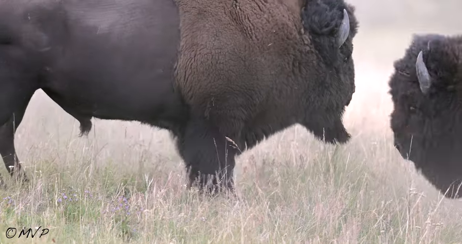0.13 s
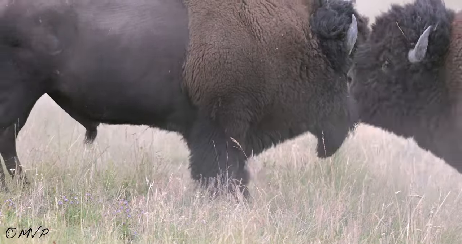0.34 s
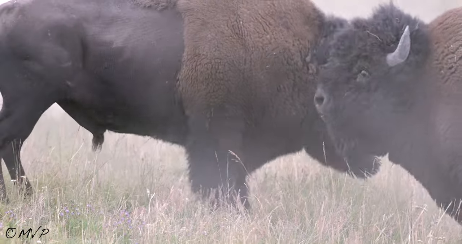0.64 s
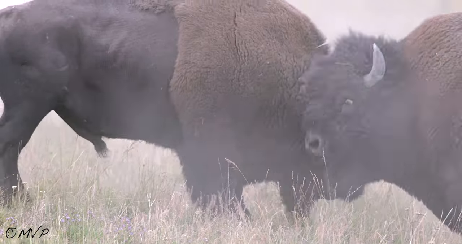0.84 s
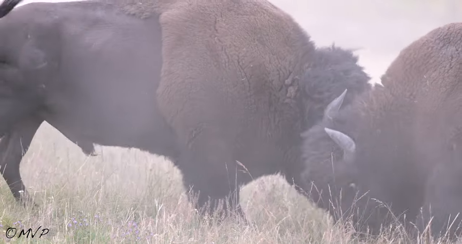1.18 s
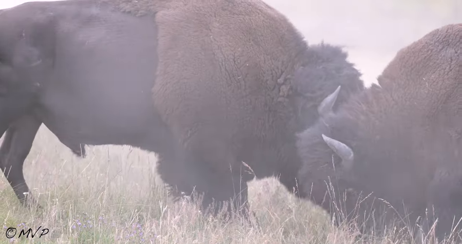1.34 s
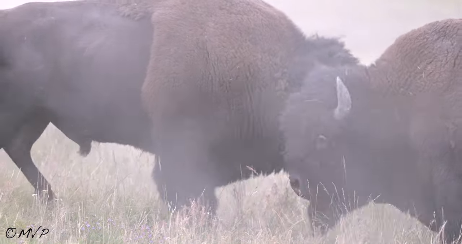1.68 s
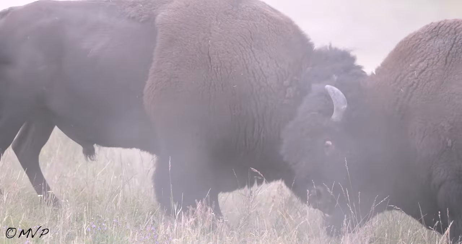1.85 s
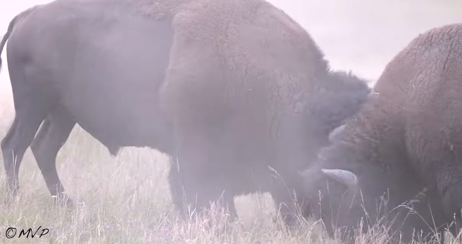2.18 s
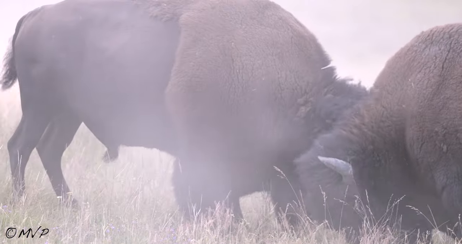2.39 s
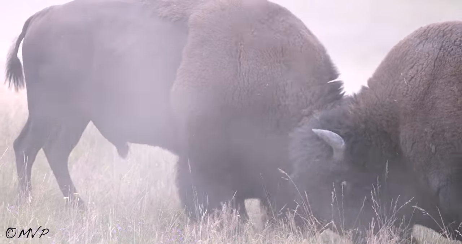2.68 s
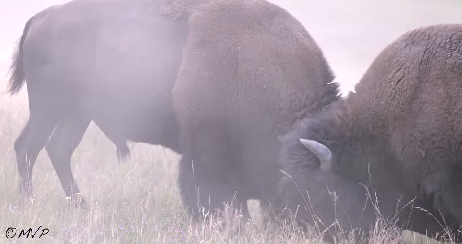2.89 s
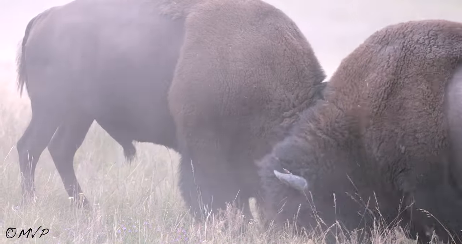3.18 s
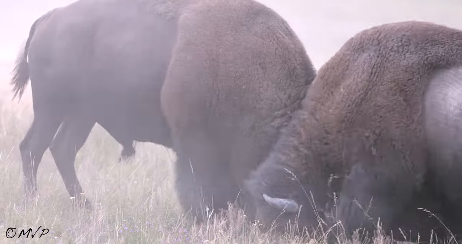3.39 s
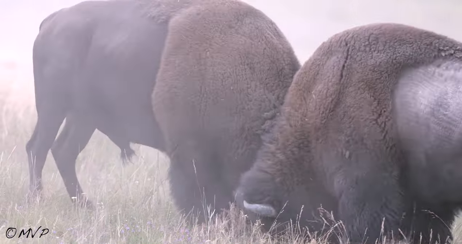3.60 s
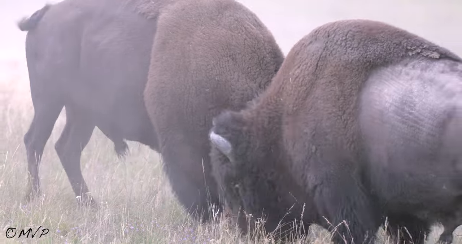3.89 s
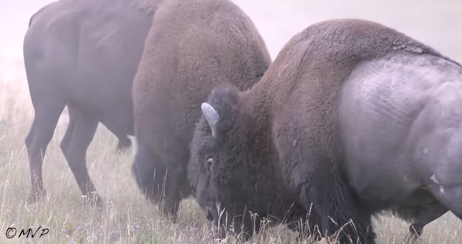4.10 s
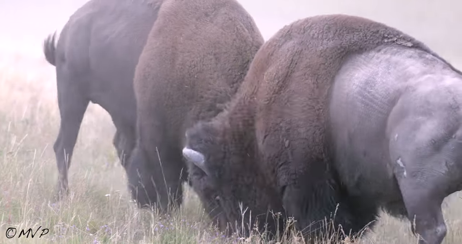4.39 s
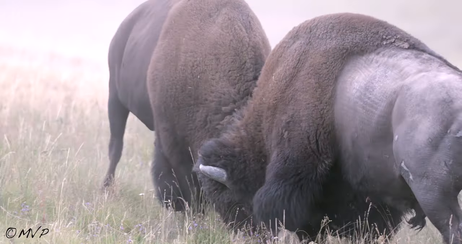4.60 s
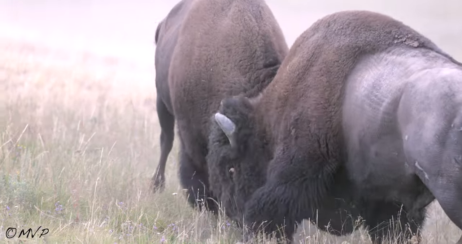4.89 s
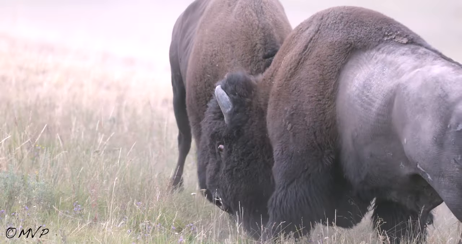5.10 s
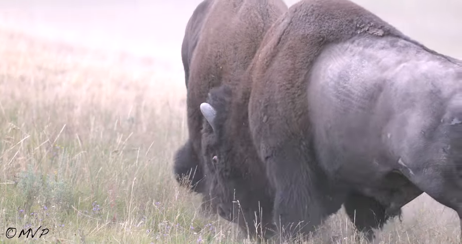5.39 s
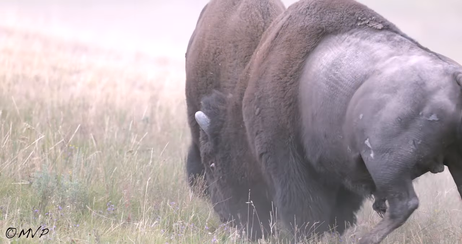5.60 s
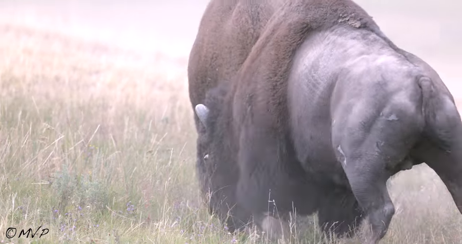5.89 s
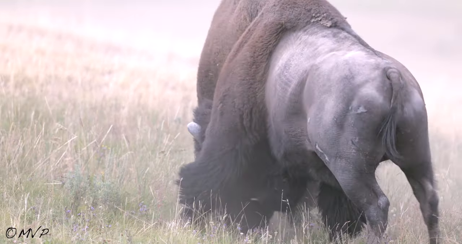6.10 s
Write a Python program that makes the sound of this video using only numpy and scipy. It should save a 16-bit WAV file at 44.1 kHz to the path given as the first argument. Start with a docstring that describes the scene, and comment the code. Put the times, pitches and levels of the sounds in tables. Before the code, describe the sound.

Low pulsing bison growls rumble close by over faint grass rustle, with breathy snorts, hard throaty knocks and late heavy hoof and body blows.

```python
"""Two bison bulls bellow as they shove each other: slow, uneven throat pulses ring chest, throat and mouth.
Some bellows clear into a held tone, and single hard pulses pop out sharply.
The bulls snort noise through the resonances of the nose; hooves and bodies thump as low decaying tones.
Dry grass rustles over a low rumble and a soft hiss, both shaped noise; a small bird chips once."""
import sys
import numpy as np
from scipy import signal
from scipy.fft import rfft, irfft, next_fast_len
from scipy.io import wavfile
from scipy.ndimage import uniform_filter1d, map_coordinates

SR = 44100
rng = np.random.default_rng(int(sys.argv[2]) if len(sys.argv) > 2 else 0)


def waveform_to_disk(signal):
    """Save audio, clipped to [-1, 1], as 16-bit WAV at the path in sys.argv[1]."""
    frames = np.transpose(np.atleast_2d(signal))
    scaled = np.clip(frames, -1, 1) * 32767
    samples = np.round(scaled).astype(np.int16)
    wavfile.write(sys.argv[1], SR, samples)


N = 275614  # samples


def amp(db):
    """Decibels to linear gain."""
    return 10 ** (np.asarray(db) / 20)


def unit(x):
    """x scaled to an rms of 1."""
    return x / np.sqrt(np.mean(x ** 2) + 1e-20)


def along(points, hz):
    """Read (Hz, value) points on a log frequency axis."""
    f, v = np.transpose(points)
    return np.interp(np.log(hz + 1), np.log(f + 1), v)


def curves(rows):
    """One value per sample for each column after the time."""
    s, *cols = np.transpose(rows)
    return [np.interp(np.arange(N) / SR, s, c) for c in cols]


def since(s):
    """Seconds since s, for every sample."""
    return np.arange(N) / SR - s


def envelope_db(t, length, attack, release):
    """Full from t = 0 for length; attack and release are the seconds for a change of 20 dB."""
    return -20 * (np.maximum(-t, 0) / attack + np.maximum(t - length, 0) / release)


def wobble(rate):
    """A smooth random curve, rate knots a second."""
    at = np.arange(0, N, 16)
    knots = rng.standard_normal(int(N * rate / SR) + 4)
    return np.interp(np.arange(N), at, map_coordinates(knots, [at * rate / SR]))


def filtered(x, response):
    """x times a complex response of frequency."""
    m = next_fast_len(N + SR // 2)
    return irfft(rfft(x, m) * response(np.fft.rfftfreq(m, 1 / SR)), m)[..., :N]


def noise(spectrum, alike):
    """Stereo noise of rms 1 with a given spectrum and left-right likeness."""
    def mid_side(hz):
        turn = np.arccos(np.clip(along(alike, hz), -1, 1)) / 2
        return amp(along(spectrum, hz)) * [np.cos(turn), np.sin(turn)]

    mid, side = filtered(rng.standard_normal((2, N)), mid_side)
    return unit(np.array([mid + side, mid - side]))


def placed(times, shapes):
    """Sum one short waveform per row, each starting at its time."""
    first = np.round(np.clip(times, 0, None) * SR).astype(int)
    at = first[:, None] + np.arange(shapes.shape[1])
    return np.bincount(at.ravel(), shapes.ravel(), N)[:N]


def levelled(x, size):
    """x held near a running rms of 1 over size samples; the quietest stretches stay lower."""
    power = uniform_filter1d(uniform_filter1d(x * x, size), size)
    return x / np.sqrt(np.abs(power) + np.mean(x * x) / 100)


def resonances(f, modes):
    """Causal response of (Hz, width Hz, dB) modes, alternating in sign."""
    s = 1j * f
    return s * sum((-1) ** k * amp(db) * w / (c * c + s * (s + w)) for k, (c, w, db) in enumerate(modes))


def ringing(times, sizes, hz, t60, attack, bend=0):
    """Each pulse rings one resonance at its own frequency, which rises by bend (a share a second)."""
    t = np.arange(SR // 5) / SR
    tones = np.sin(2 * np.pi * hz[:, None] * (t + bend * t * t / 2))
    decay = amp(-60 * t / t60) * (1 - np.exp(-t / attack))
    return placed(times, sizes[:, None] * tones * decay)


# ground rumble, swelling as the bulls charge: time_s, level_db
RUMBLE_LEVEL = [(0, -28), (1.5, -29.5), (3.2, -30), (4.4, -25), (5.2, -31), (5.76, -17.5), (6.25, -41.5)]
# spectral tilt of the rumble: freq_hz, relative_db
RUMBLE_SPECTRUM = [(12, -25.5), (25, -6), (36, -1.5), (49, 3.5), (60, -0.5), (80, -1), (110, -10),
                   (200, -20), (500, -79)]
# spectral tilt of the open-air hiss: freq_hz, relative_db
HISS_SPECTRUM = [(76, -25.5), (130, 5.5), (255, -2), (295, 1.5), (424, -7.5), (567, -8.5), (693, -12),
                 (846, -24), (910, -11.5), (1430, -12.5), (2300, -21), (4150, -35.5), (5300, -29.5),
                 (7640, -35.5), (10000, -53)]
# stereo width of the hiss: freq_hz, left_right_likeness (1 = mono)
HISS_LIKENESS = [(100, 1), (500, 0.91), (2000, 0.12), (5000, 0.93), (9000, 1)]
HISS_DB, HISS_SINKS_S, HISS_SINK_DB = -39, 5.95, -8.5  # the hiss sinks after the last shove


def background():
    """A low uneven rumble and the soft hiss of the open meadow, both shaped noise."""
    rumble = levelled(noise(RUMBLE_SPECTRUM, [(25, 0.99), (120, 0.95)]), size=6000)
    rumble = amp(curves(RUMBLE_LEVEL)[0]) * rumble
    sunk = amp(envelope_db(since(HISS_SINKS_S), length=1, attack=0.11, release=1))
    hiss_db = HISS_DB + HISS_SINK_DB * sunk + 0.28 * wobble(2.4)
    hiss = amp(hiss_db) * noise(HISS_SPECTRUM, HISS_LIKENESS)
    return (rumble + hiss) * amp([[.5], [-.5]])  # dB left, right


# decay of the outdoor reverb: freq_hz, t60_s
MEADOW_DECAY = [(100, 0.055), (1000, 0.33), (8000, 0.31)]


def meadow(x):
    """A faint scattered answer from the ground and slopes: x convolved with decaying stereo noise."""
    hz, t, z = signal.stft(rng.standard_normal((2, SR // 2)), SR, nperseg=256)
    decay = amp(-60 * t / along(MEADOW_DECAY, hz)[:, None])
    tail = signal.istft(z * decay, SR, nperseg=256)[1]
    delayed = np.pad(x, (300, 0))  # samples
    return signal.fftconvolve(delayed[None], tail / np.linalg.norm(tail[0]), axes=1)[:, :N]


# how hard the hooves work the grass: time_s, level_db
TRAMPLING_LEVEL = [(0, -47), (1.8, -53.5), (3.6, -53), (4.3, -43.5), (5.4, -46.5), (6.25, -46.5)]


def trampling():
    """Dry grass and dust rustle as the bulls push on: shaped noise in a fast random flicker."""
    level_db, = curves(TRAMPLING_LEVEL)
    spectrum = [(200, -17), (420, 3.5), (800, 1.0), (1100, -2.0), (1650, -7.0), (2100, -2.5),
                (3200, -15.0), (7000, -31.0), (10000, -37.0)]
    stalks = noise(spectrum, [(1000, 0.23)])
    return amp(level_db) * unit(amp(2.64 * wobble(200)) * stalks)


CHIP_S, CHIP_LENGTH_S, CHIP_DB = 1.988, 0.033, -45.5
# the pitch settles towards CHIP_HZ from above
CHIP_HZ, CHIP_DROP_HZ, CHIP_GLIDE_S = 7700, 950, .023


def bird():
    """One thin chip that falls quickly and levels off, with a second voice just above it."""
    t = np.maximum(since(CHIP_S), -CHIP_GLIDE_S)
    hz = CHIP_HZ + CHIP_DROP_HZ * np.exp(-t / CHIP_GLIDE_S)
    phase = 2 * np.pi * np.cumsum(hz * (1 + 0.0027 * wobble(380))) / SR
    level_db = CHIP_DB + envelope_db(since(CHIP_S), CHIP_LENGTH_S, attack=.014, release=0.012)
    return amp(level_db) * (np.sin(phase) + 0.49 * np.sin(1.07 * phase))


# hoof and body blows: start_s, drive_db, slap_db (relative to drive), push_pitch_hz
BLOWS = [(5.227, -11.5, -26, 42), (5.321, -5, -29.5, 32), (5.415, -8, -24, 32.8), (5.588, -4.5, -11, 40),
         (5.603, -4, -9.5, 92.4), (5.622, -11.5, 1, 109.7), (5.651, -5, -13, 49.9), (5.69, -8, -11.5, 37.3),
         (5.747, -1, -14, 33), (5.759, -6, -4.5, 60.4), (5.779, -14, -5, 111.4)]


def thumps():
    """Each blow is a low decaying push, uneven in stereo, and a dull swelling slap of hide and turf."""
    s, db, slap_db, hz = np.transpose(BLOWS)
    t = np.arange(SR // 5) / SR
    push = ringing(s, amp(db), hz, t60=0.1, attack=0.0069)
    # the sway comes 7 ms later at a scattered pitch, in opposite polarity left and right
    sway_hz = hz * np.exp(0.35 * rng.standard_normal(len(s)))
    sway = ringing(s + .007, amp(db), sway_hz, t60=0.15, attack=.005)
    swell = amp(-60 * t / 0.088) * (1 - np.exp(-t / 0.006)) ** 2
    swells = placed(s, amp(db + slap_db)[:, None] * swell)
    slap_spectrum = [(60, -10), (200, 6.5), (400, -1.0), (600, -13.5), (900, -23), (3000, -62.5)]
    slap = swells * noise(slap_spectrum, [(300, 0.26)])
    return push * amp([[1.2], [-1.2]]) + amp(-2.0) * np.array([sway, -sway]) + slap


JET_DB = -7  # the broad rush of a snort, against its resonances


def snort(row, peaks):
    """Air rings the nose; wet nostrils flutter, and the resonances slide and blur as its shape changes."""
    s, length, rise, fall, rush_db, hiss_db, slide = row
    modes = [(hz, (32 + 0.03 * hz) * (1 + abs(slide)), db) for hz, db in peaks]
    flutter = levelled(amp(4 * wobble(130) + 4.4 * wobble(500)), size=1500)
    air, jet = flutter * rng.standard_normal((2, N))
    # two interleaved groups of resonances waver independently
    groups = filtered(air, lambda hz: np.array([resonances(hz, modes[k::2]) for k in range(2)]))
    steady_nose = sum(group * amp(wobble(16)) for group in groups)
    # reading the noise at a changing speed slides its resonances
    speed = 2 ** (slide * np.clip(since(s), -rise / 2, length + fall / 2))
    sounding = np.abs(since(s + length / 2)) < .6
    slid = map_coordinates(steady_nose, [np.cumsum(speed[sounding])])
    nose = np.zeros(N)
    nose[sounding] = unit(slid)
    # the jet outside the nostrils adds a broad rush between the resonances
    rush = unit(filtered(jet, lambda hz: hz / (hz + 400) / (1 + hz / 2500)))
    nose += amp(JET_DB) * sounding * rush

    def split(hz):
        """Rush below about 3800 Hz, nostril hiss above."""
        tilt = (hz / 3800) ** 8
        return np.array([hz ** 0, tilt / (1 + (hz / 8700) ** 16)]) / (1 + tilt)

    low, high = filtered(nose, split)
    mix = amp(rush_db) * low / low[sounding].std() + amp(hiss_db) * high / high[sounding].std()
    return amp(envelope_db(since(s), length, rise, fall)) * mix


# snorts: full_force_s, length_s, rise_s (per 20 dB), fall_s (per 20 dB), rush_db, nostril_hiss_db,
# slide_octaves_per_s
SNORT_EVENTS = [(0.615, 0.1, 0.2, 0.17, -42, -63.5, 0), (0.762, 0.04, .04, 0.1, -46.5, -59.5, 2),
                (2.341, .08, 0.11, 0.11, -44, -54, 0), (2.44, 0.22, 0.061, .16, -43, -53, -.07),
                (4.032, 0.17, 0.19, 0.031, -42, -53, 0.5), (5.732, 0.058, 0.12, 0.07, -39.5, -52, -2.5),
                (5.819, 0.074, .07, 0.22, -38.5, -55, -0.1)]
# resonances of the nose, one list for each snort: freq_hz, level_db
NOSE_RESONANCES = [
    [(600, 10.5), (1290, 3.5), (2300, -10.5), (3250, -11), (5200, -9)],
    [(1300, 3.5), (2260, -7), (3270, -11), (3950, -5.5)],
    [(603, 8), (996, 3), (2300, -1), (3740, -9), (5000, -6.5), (7300, -18.5)],
    [(620, 11.5), (1000, 4.5), (1240, 4), (2370, -1), (3040, 4.5), (3660, -10), (5000, 0), (5400, -1.5),
     (6500, -15.5)],
    [(665, 8), (1100, -1.5), (3300, -11.5), (4550, -9.5), (5650, -10.5), (7600, -19)],
    [(700, 8), (1250, 4.5), (2700, -5.5), (3600, -2), (4900, -5.5), (6200, -15.5)],
    [(1050, 8), (1350, 0), (1950, 4.5), (2370, 0.5), (2750, -0.5), (3500, -10.5), (6000, -9), (7900, -8)],
]


def snorts():
    """Every snort is air through its own shape of the nose."""
    return sum(snort(row, peaks) for row, peaks in zip(SNORT_EVENTS, NOSE_RESONANCES))


# resonances of the open mouth: freq_hz, width_hz, level_db
MOUTH_RESONANCES = [(590, 140, -9.5), (765, 30, -8.5), (978, 60, -0.5), (1206, 164, -2.5),
                    (1372, 134, -4.5), (1900, 200, -20)]
MOUTH_TOP_HZ = 7000  # the soft mouth swallows the treble above this


def mouth(x):
    """Ring x through the resonances of the open mouth."""
    return filtered(x, lambda hz: resonances(hz, MOUTH_RESONANCES) / (1 + (hz / MOUTH_TOP_HZ) ** 10))


# the hardest single pulses: start_s, knock_db, treble_db (relative to knock)
HARD_PULSES = [(0.544, -29.5, -23), (0.624, -22.5, -19), (.694, -29.5, -13.5), (0.728, -23, -16.5),
               (2.371, -28, -12.5), (2.515, -30.5, -11), (2.606, -28.5, -25.5), (2.584, -24.5, -5.5),
               (2.621, -27, -14), (2.657, -20.5, -20), (3.977, -18.5, -25), (4.119, -27.5, -15.5),
               (4.187, -24, -17), (4.26, -30.5, -23.5), (4.382, -30.5, -25.5), (4.523, -26, -22.5),
               (4.568, -22.5, -23.5), (4.637, -26, -27), (4.686, -28, -24.5), (5.029, -28.5, -28.5),
               (5.055, -27, -24.5), (5.156, -28, -30), (5.265, -28, -27), (5.724, -22.5, -21),
               (5.743, -24.5, -13.5), (5.762, -25, -23.5), (5.83, -30.5, -16), (5.851, -26, -9),
               (5.874, -21, -19.5), (5.908, -27.5, -17.5), (5.945, -22.5, -20.5), (6.011, -25, -21),
               (5.983, -28, -25), (6.044, -34, -23.5), (6.218, -32.5, -28)]


def pops():
    """Single hard pulses knock in the mouth and thud in the chest, with a wet click on top."""
    s, db, treble_db = np.transpose(HARD_PULSES)
    t = np.arange(SR // 40) / SR
    puffs = rng.standard_normal((len(s), len(t))) * amp(-60 * t / .012)
    ring_peak = np.abs(mouth(np.eye(1, N)[0])).max()  # peak of the mouth's impulse response
    knock = mouth(placed(s, amp(db)[:, None] * ((t == 0) + 0.031 * puffs))) / ring_peak
    click = placed(s, amp(db + treble_db)[:, None] * puffs)
    click_spectrum = [(300, -6), (1500, 10), (6000, 4), (8000, -4), (10000, -22)]
    click = filtered(click, lambda hz: amp(along(click_spectrum, hz)))
    thud = ringing(s, amp(db + 6.5), np.full(len(s), 140.), t60=0.052, attack=0.001)
    return knock + click + thud


# clear tones within the bellows: start_s, length_s, start_hz, end_hz, level_db
CLEAR_TONES = [(0.808, 0.16, 238.2, 234, -27), (0.817, .12, 419, 406, -41.5), (1.478, 0.074, 419, 364, -44),
               (3.436, 0.266, 429, 395, -45.5)]


def moans():
    """Now and then the rough voice clears into one held, sagging tone: a gliding, slightly unsteady sine."""
    out = np.zeros(N)
    for s, length, start_hz, end_hz, db in CLEAR_TONES:
        hz = np.interp(since(s), [0, length], [start_hz, end_hz]) * (1 + .008 * wobble(30))
        level_db = db + envelope_db(since(s), length, attack=0.032, release=0.071) + 1.5 * wobble(25)
        out += amp(level_db) * np.sin(2 * np.pi * np.cumsum(hz) / SR)
    return out


# the bellows: start_s, length_s, initial_pulses_per_s, timing_scatter_periods, throat_hz,
# throat_glide_octaves, mouth_hz (scaled to two resonances in rasp), throat_db, chest_db, mouth_rasp_db,
# mouth_air_db (levels before the voice tires)
BELLOW_EVENTS = [(0.0, .16, 44, .12, 238, 0.076, 1106, -27.5, -38.5, -58, -54),
                 (0.17, .11, 48, 0.03, 246.3, -0.038, 1174, -23.5, -33, -54.5, -62),
                 (0.307, .19, 34.5, 0.027, 242.4, -0.1, 1160, -23, -35.5, -57.5, -56.5),
                 (0.509, 0.42, 46, .2, 224.4, 0.054, 1210, -26.5, -25.5, -60, -59),
                 (1.002, 0.47, 29, .15, 232.7, -0.11, 1094, -30, -31.5, -62, -61.5),
                 (2.299, .18, 47, 0.27, 186.4, -0.18, 1062, -30.5, -26.5, -50.5, -53.5),
                 (2.528, .19, 60, .2, 200, .15, 1050, -28.5, -24.5, -49.5, -57),
                 (2.794, .37, 45.5, .013, 226, -0.22, 1013, -28.5, -39, -45.5, -53),
                 (3.181, 0.26, 46.5, .02, 223.7, -0.08, 990, -27.5, -47.5, -54, -59.5),
                 (3.459, .11, 44.5, 0.054, 179.3, -0.061, 1080, -25.5, -32, -54, -46.5),
                 (3.91, .07, 75, .016, 168.5, 0.18, 1125, -34, -31, -30, -45.5),
                 (4.025, .12, 58, 0.087, 209.8, 0.08, 1123, -22, -24, -40, -42),
                 (4.221, 0.25, 28, .1, 220.6, 0.082, 1090, -32, -35.5, -45.5, -52.5),
                 (4.498, .1, 68, 0.054, 208.3, -0.26, 1057, -25, -37.5, -42.5, -43.5),
                 (4.682, 0.13, 45, 0.11, 209.6, 0.2, 1136, -26, -31.5, -47.5, -54),
                 (4.87, .66, 40, .15, 219.8, 0.057, 1130, -30, -33.5, -50.5, -57),
                 (5.545, 0.25, 52, 0.181, 234, -0.077, 1114, -27.5, -26, -46.5, -54),
                 (5.829, 0.15, 78, .15, 215, 0, 1145, -29.5, -26.5, -43, -51.5),
                 (5.999, 0.11, 55, .12, 223.7, 0.087, 1193, -32.5, -50.5, -45.5, -54.5),
                 (6.214, .1, 38, 0.26, 226, -0.062, 1103, -31, -50, -47.5, -47.5)]
# every bellow swells, tires and dies away (attack and release per 20 dB), and its pulses slow down
ATTACK_S, RELEASE_S, TIRING_DB_PER_S, SLOWING_OCTAVES = .05, 0.27, 5, .2
MOUTH_OPEN_S, MOUTH_CLOSE_S = .08, .09  # rasp and air come and go with the mouth; per 20 dB


def fold_pulses(size_db):
    """Time, size, unevenness, throat and mouth Hz of each vocal-fold slap; every bellow restarts them."""
    t = since(0)
    rows = np.array(BELLOW_EVENTS)
    current = np.maximum(np.searchsorted(rows[:, 0] - MOUTH_OPEN_S / 2, t) - 1, 0)
    s, length, rate, scatter, throat_hz, glide, mouth_hz, *_ = rows[current].T
    progress = np.clip((t - s) / length, 0, 1)
    cycles = np.cumsum(rate * 2 ** (-SLOWING_OCTAVES * progress)) / SR
    # one slap for each whole cycle counted from the start of the bellow
    at = np.flatnonzero(np.diff(np.ceil(cycles - np.interp(s, t, cycles)), prepend=0) > 0)
    slip, size = rng.standard_normal((len(at), 2)).T
    uneven = np.abs(scatter[at])
    times = t[at] + slip * uneven / rate[at]
    sizes = amp(size_db * size * np.sqrt(uneven))
    return times, sizes, uneven, throat_hz[at] * 2 ** (glide[at] * progress[at]), mouth_hz[at]


def loudness(db, attack, release):
    """The gain of one part of the voice through all bellows, given its level in each."""
    t = np.arange(0, N, 64) / SR
    each = [level - TIRING_DB_PER_S * np.maximum(t - s, 0) + envelope_db(t - s, length, attack, release)
            for (s, length, *_), level in zip(BELLOW_EVENTS, db)]
    return np.interp(np.arange(N) / SR, t, amp(np.max(each, axis=0)))


def rasp(times, sizes, uneven, mouth_hz, spread_db):
    """Fold pulses ring two mouth resonances, the upper one chirping; uneven ones vary in force and ring, and
    puff more air."""
    force, shape = np.sqrt(uneven) * rng.standard_normal((2, len(times)))
    sizes, hz = sizes * amp(spread_db * force), mouth_hz * np.exp(0.22 * shape)
    ring = ringing(times, sizes, 0.94 * hz, t60=0.021, attack=0.0016, bend=16.8)
    ring -= amp(-13.0) * ringing(times, sizes, 0.66 * hz, t60=0.034, attack=0.00062)
    t = np.arange(SR // 40) / SR
    bursts = rng.standard_normal((len(times), len(t))) * amp(-60 * t / 0.014)
    puffs = mouth(placed(times, (sizes * uneven ** 0.7)[:, None] * bursts))
    return levelled(unit(ring) + amp(-3.5) * unit(puffs), size=5000)


# colour of the throat through its wall: freq_hz, gain_db
THROAT_COLOUR = [(40, -25), (110, -8.5), (165, 9), (255, 6.5), (310, -5), (420, 0.5), (700, -10),
                 (1500, -45.5)]
# spectral tilt of the air streaming from the mouth: freq_hz, relative_db
AIR_STREAM_SPECTRUM = [(300, -19), (750, -0.5), (1120, 1.5), (1600, -14), (5000, -44)]
GRUMBLE_DB = -47.5  # floor of throat and chest, which never fall quite silent


def bellow():
    """Slow fold pulses boom in throat and chest, and rasp over a stream of air when the mouth opens."""
    times, sizes, uneven, throat_hz, mouth_hz = fold_pulses(size_db=1.0)
    *_, throat_db, chest_db, mouth_db, air_db = np.transpose(BELLOW_EVENTS)
    # uneven pulses also shake the pitch of the resonances
    shake = (uneven + 0.099) * rng.standard_normal((2, len(times)))
    throat = ringing(times, sizes, throat_hz * np.exp(0.3 * shake[0]), t60=0.11, attack=0.0011)
    throat = filtered(throat, lambda hz: amp(along(THROAT_COLOUR, hz)))
    upper_hz = 415 * np.exp(0.1 * shake[0])
    throat += amp(-13.0) * ringing(times, sizes, upper_hz, t60=0.07, attack=0.0024)
    chest = ringing(times, sizes, 132 * np.exp(0.81 * shake[1]), t60=0.061, attack=0.0042)
    boom = np.zeros(N)
    for db, part in [(throat_db, throat), (chest_db, chest)]:
        gain = np.maximum(loudness(db, ATTACK_S, RELEASE_S), amp(GRUMBLE_DB))
        boom += gain * levelled(part, size=3000)
    flickering = amp(5.6 * wobble(150)) * rng.standard_normal(N)
    air = unit(filtered(flickering, lambda hz: amp(along(AIR_STREAM_SPECTRUM, hz))))
    rasping = rasp(times, sizes, uneven, mouth_hz, spread_db=8.0)
    return (boom + loudness(mouth_db, MOUTH_OPEN_S, MOUTH_CLOSE_S) * rasping
            + loudness(air_db, MOUTH_OPEN_S, MOUTH_CLOSE_S) * air)


def scene():
    """Bulls and bird with their answer from the meadow, over the rustling grass and the background."""
    direct = bellow() + moans() + pops() + snorts() + bird() + thumps()
    return direct + amp(-14.0) * meadow(direct.mean(axis=0)) + trampling() + background()


# phase between the microphones: freq_hz, left_lead_rad
MIC_PHASE = [(100, 0.096), (500, -0.23), (1460, -0.64), (3500, -0.9), (4800, -0.3)]
# level between the microphones: freq_hz, left_minus_right_db
MIC_BALANCE = [(2000, 0.5), (5000, -3.5), (8000, 1)]
TOP_HZ = 10185  # band limit


def record(dry):
    """Two microphones differ in phase and colour; the deepest bass and all above the band limit drop out."""
    def response(hz):
        between = np.exp(1j * along(MIC_PHASE, hz)) * amp(along(MIC_BALANCE, hz))
        ports = between ** np.array([[.5], [-.5]])  # half the difference on each side
        return ports * 1j * hz / (12 + 1j * hz) * (hz < TOP_HZ)

    return filtered(dry, response)


dry = scene()
out = record(dry)
waveform_to_disk(out)
```